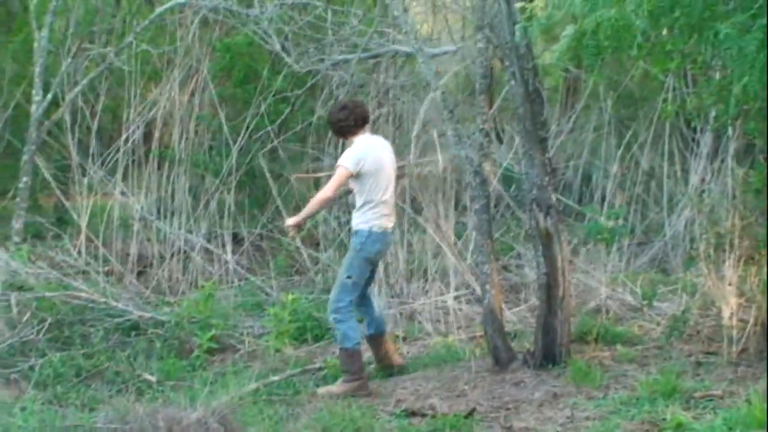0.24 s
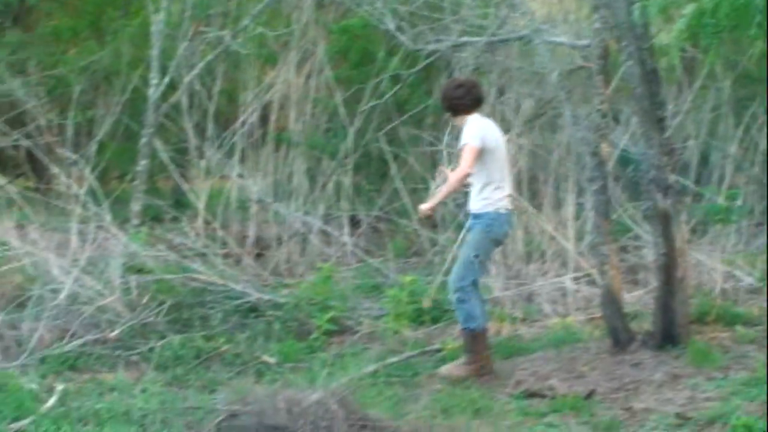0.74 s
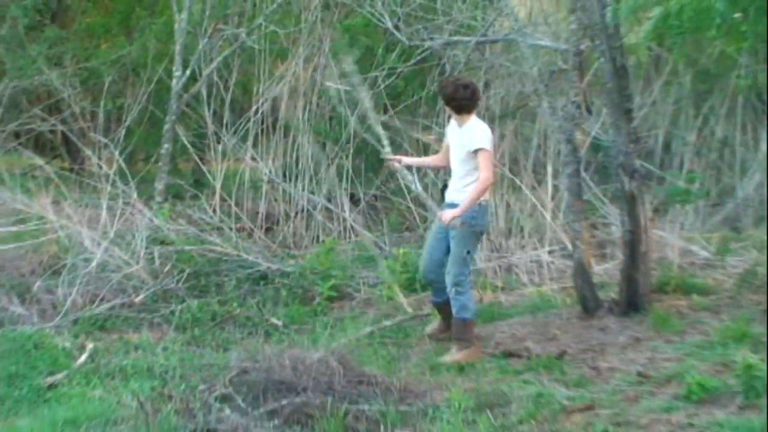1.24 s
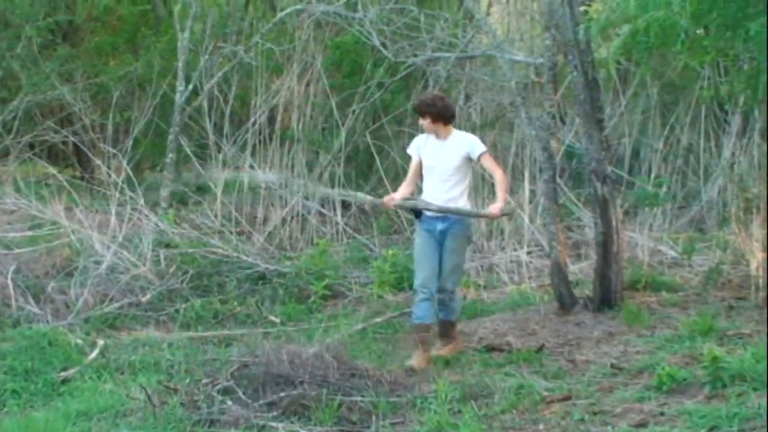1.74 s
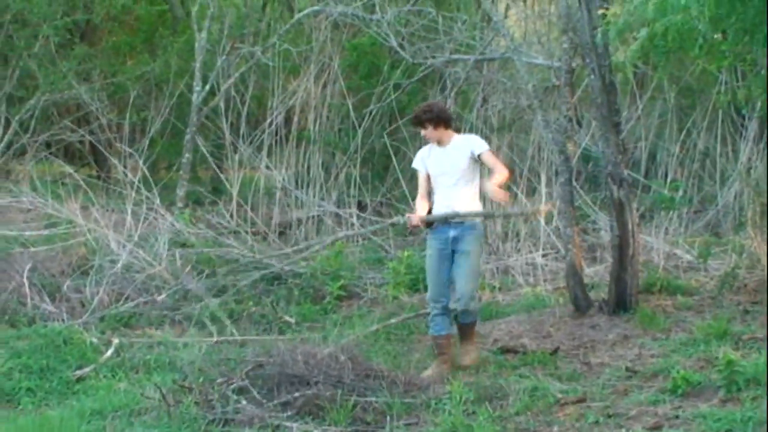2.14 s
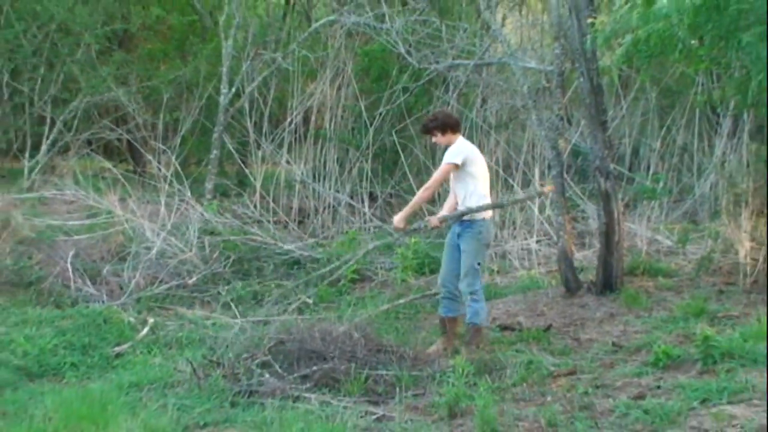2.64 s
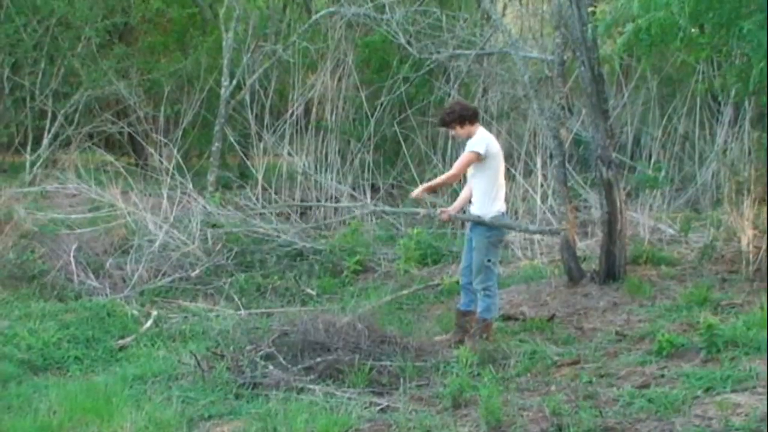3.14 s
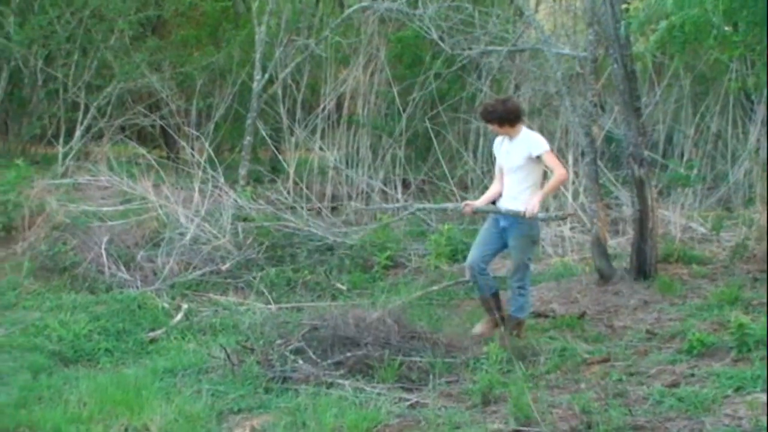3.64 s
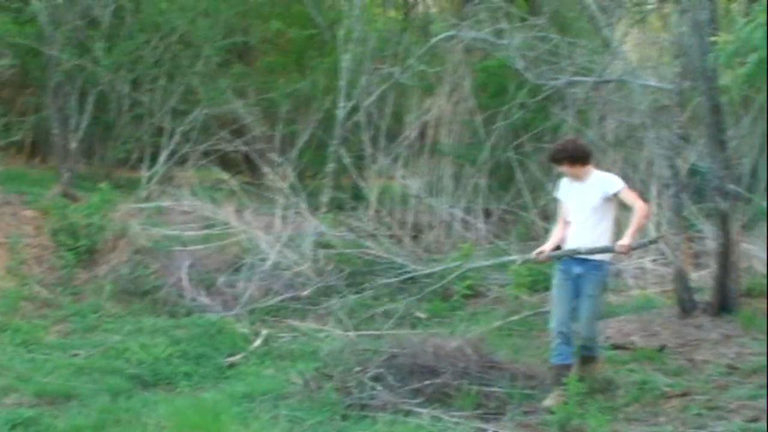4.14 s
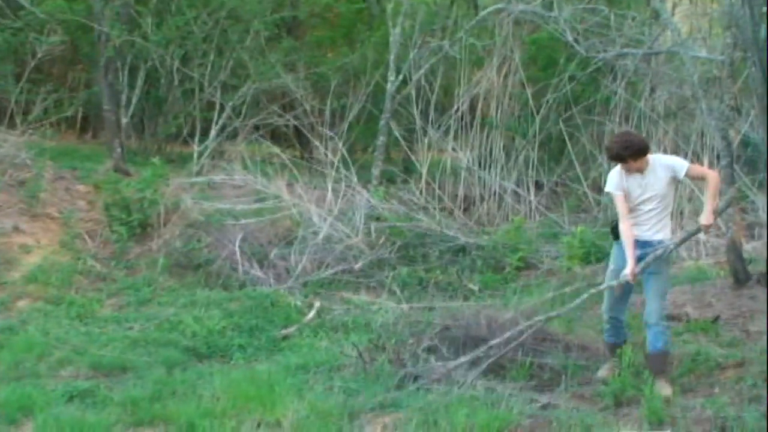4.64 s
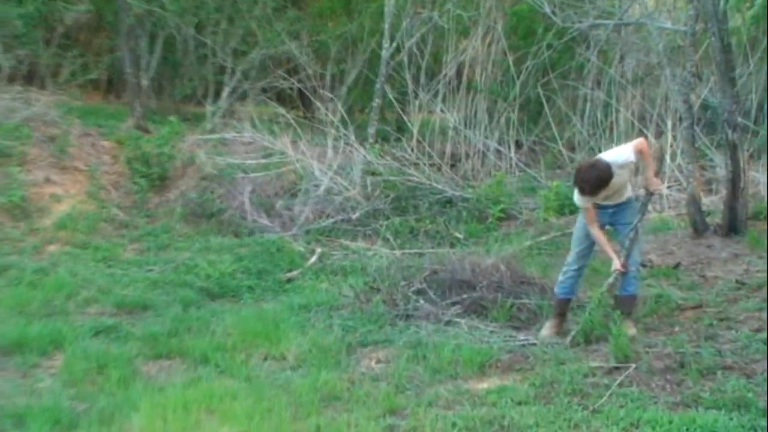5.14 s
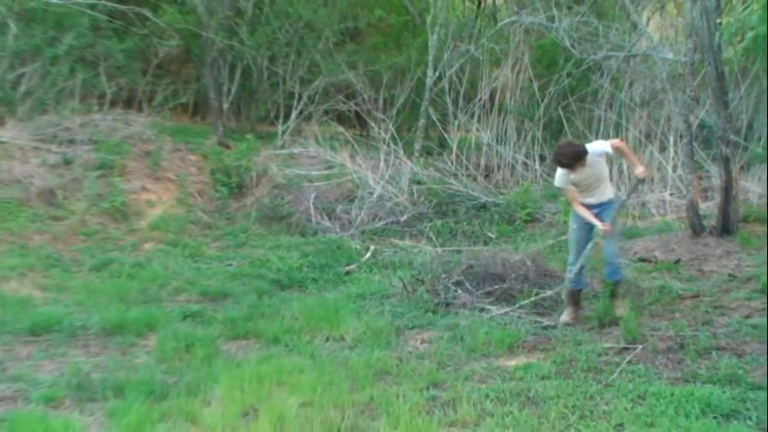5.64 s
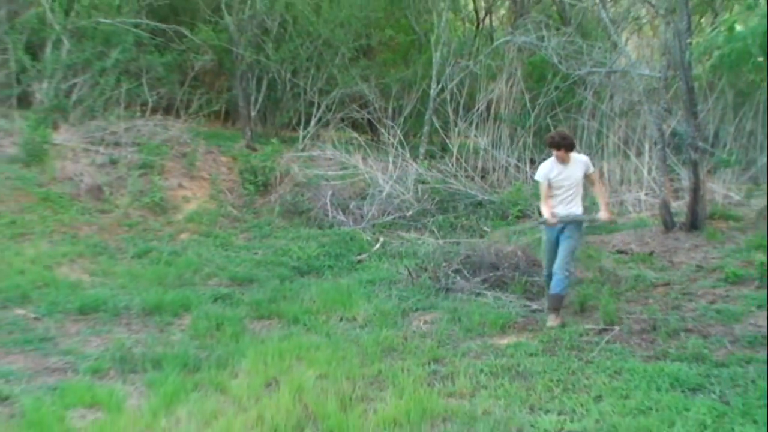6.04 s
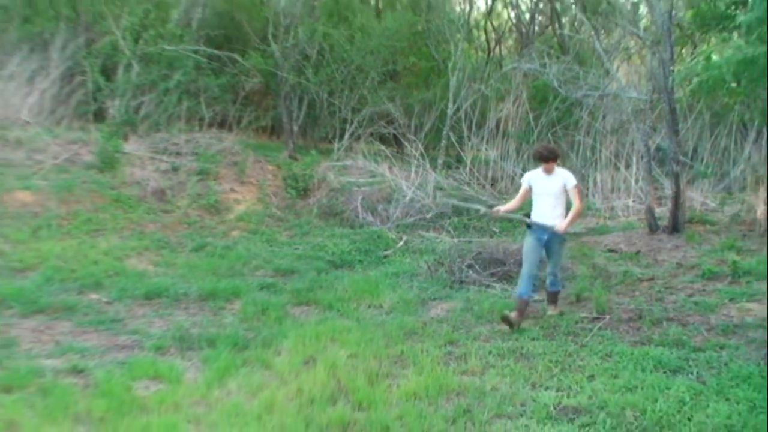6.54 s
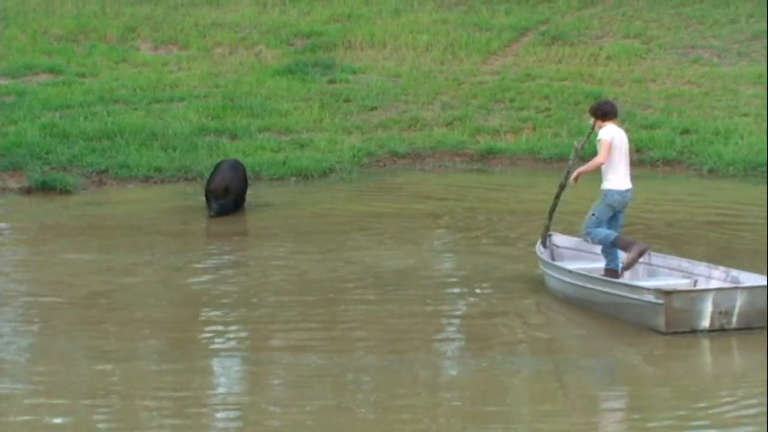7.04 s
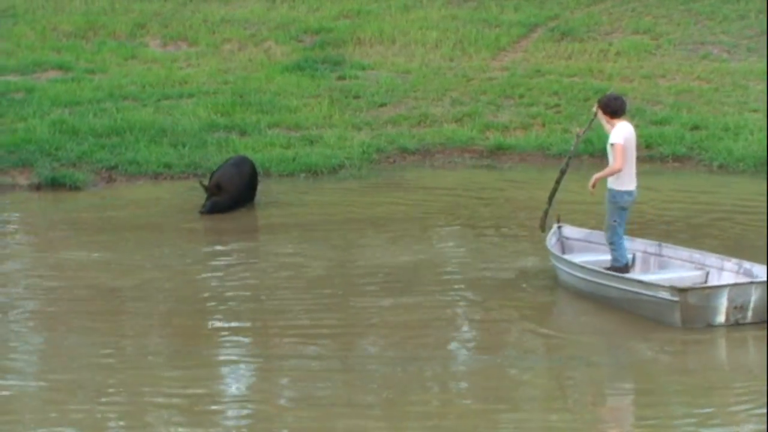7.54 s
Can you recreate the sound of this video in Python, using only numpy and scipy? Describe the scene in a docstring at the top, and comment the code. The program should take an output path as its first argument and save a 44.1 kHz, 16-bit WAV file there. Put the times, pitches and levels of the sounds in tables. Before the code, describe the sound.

From 0 to 1.2 seconds a dead branch is dragged through grass and brush: dense, bright leafy swishes, rapid twig snaps, a stick breaking cleanly near 0.55, and soft boot thuds near 0.9. Handling then thins to quiet stirring, with rising bird chirps from 1.4 to 2.3 and a crisp crack at 2.6. Low wind rumble swells around 3 to 4.5, with snaps near 3.1, 3.9 and 4.35 to 4.6 and a run of falling bird notes. The biggest crunch, woody and loud, comes at 5.0 to 5.2. Sparse light snaps and rustles follow until 6.7. Crickets chirp and katydids buzz throughout. At 6.74 the place abruptly changes to a pond: a strong hollow metal boat thump at 6.8, fainter knocks around 7.0 and 7.4, firmer ones at 7.5, a last at 7.7, with small ticks, slightly louder airy hiss and insect trill.

```python
"""Leaves rustle and twigs snap as a dead branch is dragged over grass and through brush; boots thud, wind buffets
the microphone; birds, crickets and a trilling katydid sing behind. The scene then moves to a pond, where boots
knock on a metal boat. Leaves, wind and air are shaped noise; twigs, soil and hull are bursts into resonators;
birds and crickets are gliding sines; katydids are throbbing noise bands."""
import sys
import numpy as np
from scipy import signal
from scipy.fft import rfft, irfft, next_fast_len
from scipy.io import wavfile

SR = 44100
rng = np.random.default_rng(int(sys.argv[2]) if len(sys.argv) > 2 else 0)


def transcribe(signal):
    """Save signal, clipped to [-1, 1], as a 16-bit WAV file at the path in sys.argv[1]."""
    frames = np.atleast_2d(signal).T
    limited = np.clip(frames, -1, 1)
    pcm = np.round(limited * 32767).astype(np.int16)
    wavfile.write(sys.argv[1], SR, pcm)


N = 343362
T = np.arange(N) / SR
POND_S = 6.735   # the scene moves to the pond
# Left-right likeness of the ports. Each row: pitch in Hz, correlation (0 to 1).
LIKENESS = [(40, 0.56), (200, 0.21), (1200, 0.57), (5000, 0.28), (15000, 0.24)]


def from_db(db):
    """Decibels to amplitude ratio."""
    return 10 ** (np.asarray(db) / 20)


def rms_one(x):
    """Scale to unit RMS."""
    return x / np.sqrt(np.mean(x ** 2) + 1e-20)


def in_time(rows):
    """Straight lines between timed rows, one curve per column."""
    s, *columns = np.transpose(rows)
    return [np.interp(T, s, c) for c in columns]


def at_hz(points, hz):
    """Read a curve at a pitch, linear in log frequency."""
    points_hz, values = np.array(points).T
    return np.interp(np.log(hz), np.log(points_hz), values)


def band(x, low_hz, high_hz):
    """Butterworth band-pass."""
    return signal.sosfilt(signal.butter(2, [low_hz, high_hz], "band", fs=SR, output="sos"), x)


def drift(rate_hz):
    """Slow random curve of unit RMS: noise through two equal poles at SR / 40."""
    r = np.exp(-80 * np.pi * rate_hz / SR)
    noise = rng.standard_normal(N // 40 + 2002)
    slow = signal.lfilter([1], [1, -2 * r, r * r], noise)[2000:]
    return np.interp(np.arange(N) / 40, np.arange(len(slow)), rms_one(slow))


def ring(x, hz, t60_s):
    """Two-pole resonator: a unit click sets a sine of height 1 ringing."""
    r = from_db(-60 / (t60_s * SR))
    w = 2 * np.pi * hz / SR
    return signal.lfilter([0, np.sin(w)], [1, -2 * r * np.cos(w), r * r], x + 1e-18)


def add(out, s, sound):
    """Mix a sound in at s seconds."""
    i = round(s * SR)
    out[..., i:i + sound.shape[-1]] += sound[..., :N - i]


def spread(mid, side, alike):
    """Left and right from mid and side noise, with the given correlation."""
    return np.sqrt(.5 + alike / 2) * mid + np.sqrt(.5 - alike / 2) * side * [[1], [-1]]


def pair(hz):
    """Left and right noise as alike as the ports make it at this pitch."""
    mid, side = rng.standard_normal((2, N))
    return spread(mid, side, np.clip(at_hz(LIKENESS, hz), -1, 1))


def banded(spectrum, tilt_db, patchy_db, grain=1, bass_share=1):
    """Half-octave noise bands under one grain envelope; tilt pivots at 3 kHz, bass_share scales it below."""
    out, power = 0, 0
    edges_hz = 60 * 2 ** np.arange(0, 8.6, .5)
    white = rng.standard_normal((2, 2, N)) * grain
    together = drift(29.0)
    for k, (low_hz, high_hz) in enumerate(zip(edges_hz, edges_hz[1:])):
        mid, side = band(white[k % 2], low_hz, high_hz)
        hz = np.sqrt(low_hz * high_hz)
        alike = np.clip(at_hz(LIKENESS, hz), -1, 1)
        both = from_db(at_hz(spectrum, hz)) * np.sqrt(2) * spread(mid, side, alike)
        power += np.mean(both ** 2)
        octaves = np.log2(hz / 3000) * (1 if hz > 3000 else bass_share)
        patches = .6 * together + drift(10)
        out = out + both * from_db(tilt_db * octaves + patchy_db * patches)
    return out / np.sqrt(power)


def dragging():
    """Rustle level and brightness: sweeps swell, hold and fade over quiet stirring; brightness is power-weighted."""
    # Quiet rustle of grass and clothes between the pulls.
    # Each row: time in seconds, level in dB, brightness in dB per octave.
    stirring = [(0, -53, -5), (1.22, -47, 5), (1.3, -50.5, 4), (1.55, -49, 1), (1.8, -55.5, 6),
                (2.3, -55.5, 7), (3.0, -58.5, 7), (3.4, -61.5, 6.5), (3.8, -57.5, 5), (5.4, -58, 5.5),
                (6.7, -56.5, 4.5), (6.75, -63, 0), (7.78, -72, 14)]
    # Pulls and steps through leaves.
    # Each row: start in seconds, hold in seconds, level in dB, brightness in dB per octave.
    pulls = [(0.0, 0.0072, -42, 5.5), (0.113, 0.14, -44, 4.5), (0.32, 0.23, -43, 5), (0.705, 0.16, -44, 1),
             (0.946, 0.1, -43, -3), (1.1, 0.046, -42.5, 1.5), (1.853, 0.0082, -49, 3.5),
             (2.15, 0.0087, -51, -0.5), (2.455, .01, -52.5, -1), (3.09, 0.1, -51.5, 3),
             (3.89, 0.08, -46, 6), (4.01, 0.14, -48.5, 3.5), (4.363, 0.017, -50, 7),
             (4.477, 0.039, -44.5, 5), (4.775, 0.0092, -46.5, 1), (4.998, 0.027, -47.5, 2),
             (5.113, 0.08, -37, -1), (5.593, 0.0077, -50.5, 3), (5.897, 0.029, -51.5, 2.5),
             (6.032, .01, -47, 2.5), (6.29, 0.021, -51.5, 1)]
    swell_db_per_s, fade_db_per_s = 161, 103
    stir_db, stir_bright_db = in_time(stirring)
    power = from_db(2 * stir_db)
    bright = power * stir_bright_db
    for s, hold_s, level_db, bright_db in pulls:
        before_s, after_s = np.maximum(s - T, 0), np.maximum(T - s - hold_s, 0)
        sweep = from_db(2 * (level_db - swell_db_per_s * before_s - fade_db_per_s * after_s))
        power = power + sweep
        bright = bright + sweep * bright_db
    return 10 * np.log10(power), bright / power


def rustle(per_s=250, spread_db=3.0, grain_s=0.003, smooth=4.1, stems_db=-6, clump_db=6.0, even_db=4.0, twang_db=-9):
    """Leaves scrape as a grainy swish the branch colours; thin stems tick at pitches of their own, in clumps."""
    # Leaf noise before brightness. Each row: pitch in Hz, relative density in dB per Hz.
    leaf_spectrum = [(180, -11), (350, 0), (900, -4), (1500, -2), (3500, 4.5), (6500, -1), (9500, -5.5),
                     (13300, -11), (16000, -18)]
    # Branch resonances: pitches in Hz.
    branch_hz = (1570, 3326, 4800)
    level_db, bright_db = dragging()
    sizes = from_db(spread_db * np.minimum(rng.exponential(1, N), 4.0))
    chance = per_s * from_db(drift(12.0) * [[even_db], [clump_db]]) / SR
    born = rng.random((2, N)) < chance   # leaf cracks, stem ticks
    cracks = signal.lfilter([1], [1, -np.exp(-1 / (grain_s * SR))], sizes * born[0])
    swish = banded(leaf_spectrum, bright_db, 1.1, grain=rms_one(smooth + cracks), bass_share=-0.17)
    twang = sum(rms_one(ring(swish, hz, 0.013)) for hz in branch_hz)
    swish = swish + from_db(twang_db) * twang
    dealt = rng.integers(0, 16, N)   # which stem ticks
    stems = 0
    for k, hz in enumerate(np.geomspace(1500, 7000, 16)):
        stems = stems + rms_one(ring(sizes * born[1] * (dealt == k), hz, 51.0 / hz))
    return from_db(level_db) * (swish + from_db(stems_db) * rms_one(stems))


def snaps(wood_width=0.22, wood_s=0.022, crack_s=0.0085, spike=1.0, tail_db=-20, tail_s=0.24):
    """A tearing burst rings the twig at its pitch and cracks in the treble; splinters and brush echoes trail."""
    # Twigs. Each row: time in seconds, wood level in dB, wood pitch in Hz, treble crack level in dB.
    twigs = [(0.168, -25, 3800, -24), (0.3325, -23, 4700, -22), (0.3727, -22, 4560, -21),
             (0.393, -22.5, 2760, -36), (0.4643, -23.5, 2340, -28), (0.5464, -27, 1270, -17.5),
             (0.642, -29, 2950, -28), (0.777, -26, 2600, -35), (0.827, -25, 2600, -34),
             (0.854, -26, 2640, -36), (0.893, -30, 2900, -42), (0.9538, -22, 3350, -46),
             (1.024, -27.5, 1720, -44), (1.035, -20.5, 3630, -43), (1.082, -23, 2000, -40),
             (1.109, -24, 1600, -42), (1.12, -27, 2020, -39), (1.823, -26, 2420, -45),
             (1.8381, -22.5, 3420, -44), (1.9798, -32.5, 3600, -13), (2.1298, -29.5, 2350, -50),
             (2.161, -30.5, 2400, -45), (2.288, -34, 4960, -39), (2.469, -31.5, 2710, -42),
             (2.604, -34, 4740, -27), (2.622, -23.5, 3870, -12), (2.7162, -28.5, 3900, -21.5),
             (2.84, -42, 2320, -31), (3.1217, -21.5, 5800, -20), (3.1318, -17.5, 4130, -23),
             (3.147, -26, 1320, -34), (3.219, -39, 4000, -39), (3.3034, -40.5, 2720, -32),
             (3.8706, -35, 3740, -23), (3.89, -43, 3050, -21), (3.913, -25.5, 3770, -13.5),
             (3.953, -29, 3230, -17), (4.0522, -25.5, 3180, -15), (4.3303, -28, 5600, -18),
             (4.3547, -24.5, 5270, -9.5), (4.3813, -34, 5050, -21), (4.384, -26, 5050, -26),
             (4.394, -45, 5000, -20), (4.4547, -29.5, 4070, -20.5), (4.4902, -33, 2950, -31),
             (4.564, -22, 5300, -11.5), (4.7633, -26, 1770, -33), (4.982, -16, 1740, -19),
             (5.028, -21.5, 1820, -35), (5.0485, -23, 3000, -32), (5.0785, -10, 2130, -13),
             (5.1091, -18.5, 2820, -22), (5.1639, -10, 2980, -32), (5.1655, -10, 1590, -20),
             (5.498, -39, 2280, -27), (5.8244, -29.5, 2140, -30), (5.8507, -31.5, 4800, -37),
             (5.9953, -28, 2330, -38), (6.007, -34, 2080, -40), (6.049, -35, 2220, -27),
             (6.1955, -30.5, 2600, -15.5), (6.39, -53, 2670, -36), (6.427, -50, 1630, -31),
             (6.4312, -30, 1760, -13), (6.456, -49, 1530, -50), (6.545, -47, 4090, -21.5),
             (6.578, -33.5, 2540, -41), (6.7207, -33, 2680, -23)]
    out, t = np.zeros((2, N)), np.arange(12000) / SR
    for s, wood_db, hz, crack_db in twigs:
        noise = rng.standard_normal((3, len(t)))
        burst = noise[0] * from_db(-60 * t / wood_s) * np.minimum(t / 0.00042, 1)
        tear = band(burst, hz / (1 + wood_width), hz * (1 + wood_width)) + .5 * band(burst, 1020, 10500)
        wood = rms_one(tear) + 0.26 * rms_one(ring(burst, hz, .045))
        crack = band((noise[0] + spike * (t == 0)) * from_db(-60 * t / crack_s), 6500, 15000)
        tail = from_db(tail_db - 60 * t / tail_s) * band(noise[1:] + 1.67 * noise[0], 1820, 8300)
        add(out, s, from_db(wood_db) * (wood / np.abs(wood).max() + tail))
        sides_db = np.array([[1.0], [-.8]])
        add(out, s, from_db(crack_db + sides_db) * crack / np.abs(crack).max())
    return out


def breaks(body_share=0.39, cycles=1.7):
    """A stick breaks clean in one blow: a broad click and a dull body that swings about once."""
    # Sticks. Each row: time in seconds, peak in dB, body pitch in Hz.
    sticks = [(0.5467, -15.5, 473), (6.4932, -29, 1100)]
    out, click = np.zeros(N), signal.unit_impulse(2000)
    for s, peak_db, hz in sticks:
        blow = band(click, 400, 8300) + body_share * ring(click, hz, cycles / hz)
        add(out, s, from_db(peak_db) * blow / np.abs(blow).max())
    return out


def thuds(cycles=7.3):
    """Soft ground: a dull push into a heavily damped resonance."""
    # Boots and the branch butt on the soil. Each row: time in seconds, peak in dB, pitch in Hz.
    soil_blows = [(0.424, -42, 290), (0.549, -46, 219), (0.591, -40, 197), (0.7, -40, 265),
                  (0.788, -34.5, 197), (0.855, -28, 263), (0.92, -27.5, 243), (2.58, -47.5, 183),
                  (2.945, -36, 284), (3.91, -47, 714), (3.98, -40, 750), (4.329, -37, 590),
                  (4.354, -38, 474), (4.492, -39, 520), (4.512, -42, 272), (4.563, -46, 400),
                  (5.194, -32.5, 223), (5.852, -42.5, 258), (6.025, -48, 520), (6.108, -44, 603),
                  (6.193, -46, 705), (6.455, -42, 630)]
    out, t = np.zeros(N), np.arange(4000) / SR
    for s, peak_db, hz in soil_blows:
        push = band(rng.standard_normal(len(t)) * from_db(-60 * t / 0.076), 148, 640)
        body = rms_one(ring(push, hz, cycles / hz)) + 0.32 * rms_one(push)
        add(out, s, from_db(peak_db) * body / np.abs(body).max())
    return out


def hull(contact_s=0.0082, scatter_db=0.5, side_db=4.0, fall_db=6.5, dense_db=-8.0, rise_s=0.0018, sole_hz=900):
    """A boot scuff excites the sheet-metal modes near its colour, and their crowd of weaker neighbours."""
    # Boots on the hull. Each row: time in seconds, level in dB, centre of the blow's colour in Hz.
    boot_blows = [(6.773, -22.5, 282), (6.807, -21, 192), (7.026, -33.5, 673), (7.136, -45, 550),
                  (7.364, -33, 447), (7.519, -25, 446), (7.534, -25.5, 345), (7.664, -31.5, 625),
                  (7.698, -37, 333)]
    # Hull modes. Each row: pitch in Hz, relative level in dB, 60 dB decay in seconds.
    hull_modes = [(161, 8.5, 0.81), (190.5, -0.5, 0.76), (222.4, 4.5, 0.16), (247.4, -8.5, 0.33),
                  (304.5, 1.5, 0.13), (328, -8, 0.13), (442, -3.5, 0.31), (490, -4.5, 0.21),
                  (556, 2.5, 0.11), (596, -6, 0.44), (620.5, 2, 0.16), (693, -2, 0.16)]
    out, t = np.zeros((2, N)), np.arange(22000) / SR
    rise = np.minimum(t / rise_s, 1)
    for s, peak_db, centre_hz in boot_blows:
        scuff = band(rng.standard_normal(len(t)) * np.exp(-t / contact_s) * rise, 117, sole_hz)
        strong_db = rng.normal(0, scatter_db, (30, 1)) + rng.normal(0, side_db, (30, 2))
        modes = 0
        for k, (hz, level_db, t60_s) in enumerate(hull_modes):
            mode_db = level_db - fall_db * np.log2(hz / centre_hz) ** 2 + strong_db[k]
            modes = modes + from_db(mode_db)[:, None] * rms_one(ring(scuff, hz, t60_s))
        crowd = band(rng.standard_normal(len(t)), centre_hz / 2.3, centre_hz * 1.3) * from_db(-60 * t / 0.59)
        crowd = band(crowd * rise, 103, sole_hz)
        body = modes / np.abs(modes).max() + from_db(dense_db) * crowd / np.abs(crowd).max()
        add(out, s, from_db(peak_db) * body)
    return out


def ticks(t60_s=0.053, width=1.52):
    """Small hard ticks on the boat: decaying noise bursts a little over an octave wide."""
    # Each row: time in seconds, peak in dB, centre in Hz.
    boat_ticks = [(7.01, -45, 3000), (7.034, -41.5, 1390), (7.075, -48, 2500), (7.155, -40.5, 1460),
                  (7.51, -45, 2500), (7.527, -37, 2100), (7.537, -38, 2170), (7.615, -42.5, 1860),
                  (7.67, -33, 2130), (7.695, -44, 2200)]
    out, t = np.zeros(N), np.arange(3000) / SR
    for s, peak_db, hz in boat_ticks:
        tick = band(rng.standard_normal(len(t)) * from_db(-60 * t / t60_s), hz / width, hz * width)
        add(out, s, from_db(peak_db) * tick / np.abs(tick).max())
    return out


def wind():
    """Eddies on the ports: lumpy low noise, partly its own in each channel."""
    # Each row: time in seconds, buffeting level in dB, flutter level in dB.
    gusts = [(0, -54, -60), (0.5, -46.5, -57), (0.68, -49, -53.5), (0.8, -46, -40.5), (0.95, -51, -35),
             (1.15, -44.5, -61), (1.8, -47.5, -74), (2.4, -42.5, -69), (2.75, -45, -70), (3.05, -36, -48),
             (3.25, -32, -62), (3.6, -38.5, -80), (4.1, -35.5, -70), (4.7, -41, -47), (5.2, -43.5, -72),
             (5.5, -45.5, -60), (6.0, -52, -60), (6.7, -49.5, -61), (6.78, -57, -51), (7.2, -66, -58),
             (7.35, -65, -49.5), (7.55, -52, -45.5), (7.78, -66, -57)]
    buffet_db, flutter_db = in_time(gusts)
    buffet = rms_one(band(pair(30), 12, 42))
    flutter = rms_one(band(pair(70), 48, 90))
    lumps = from_db(1.0 * drift(5.6))
    sides = from_db([[2.0], [-0.3]])
    return (from_db(buffet_db) * buffet + from_db(flutter_db) * flutter) * lumps * sides


def birds():
    """Near-sine glides between two pitches; bend flattens the glide's end, swell places the loudest point."""
    # Rising notes of one shape. Each row: start in seconds, level in dB.
    rising_notes = [(1.381, -50), (1.612, -48), (1.85, -48), (2.078, -45), (2.32, -51)]
    # Falling notes of one shape. Each row: start in seconds, level in dB.
    falling_notes = [(3.319, -54), (3.47, -53), (3.613, -51), (3.75, -50), (3.90, -50), (4.03, -57),
                     (4.17, -51), (4.303, -52), (4.452, -50), (4.575, -48.5), (4.721, -48), (4.865, -50)]
    # Free whistles. Each row: start in seconds, length in seconds, first pitch in Hz, last pitch in Hz, level in dB.
    free_whistles = [(0.0, 0.035, 2395, 2500, -48.5), (0.22, 0.22, 2510, 2380, -49.5),
                     (0.52, 0.15, 2460, 2360, -54), (2.19, 0.1, 2690, 3120, -57),
                     (2.87, 0.16, 2050, 1736, -57.5), (4.46, 0.063, 2445, 2310, -52.5),
                     (4.643, 0.11, 2456, 2383, -49), (4.855, .035, 2410, 2410, -58),
                     (4.903, 0.12, 2460, 2396, -50.5), (5.38, 0.19, 2446, 2310, -55),
                     (5.64, 0.18, 2430, 2366, -56.5), (5.93, 0.14, 2530, 2410, -56.5),
                     (6.19, 0.14, 2447, 2395, -53.5), (6.365, 0.13, 2850, 2040, -54.5),
                     (6.47, 0.083, 2090, 1970, -62), (6.575, 0.036, 3000, 3030, -55),
                     (7.405, 0.033, 3450, 3650, -61), (7.705, 0.032, 3400, 3600, -61)]
    out, waver_hz = np.zeros(N), 10 * drift(30)
    rising = [(s, .042, 1750, 2670, db) for s, db in rising_notes]
    falling = [(s, .064, 4600, 2970, db) for s, db in falling_notes]
    for notes, bend, swell in ((rising, 1.7, 1.8), (falling, 1.9, 2.3), (free_whistles, 1.0, .9)):
        for s, length_s, first_hz, last_hz, level_db in notes:
            u = np.linspace(0, 1, round(length_s * SR))
            glide_hz = last_hz + (first_hz - last_hz) * (1 - u) ** bend
            phase = 2 * np.pi * np.cumsum(glide_hz + waver_hz[round(s * SR):][:len(u)]) / SR
            envelope = np.abs(np.sin(np.pi * u ** swell)) ** 0.35
            add(out, s, np.sqrt(2) * from_db(level_db) * envelope * np.sin(phase))
    echoes = sum(from_db(db) * np.roll(out, round(s * SR)) for s, db in ((.013, -11), (.029, -15), (.047, -18)))
    return (out + echoes) * from_db(1.2 * drift(25) + 2 * drift(90))


def crickets(pulse_s=.02, apart_s=.031):
    """Two wing strokes a chirp, each a short gliding tone; far crickets chirp at their own pace."""
    # Nearest cricket. Each row: start in seconds, level in dB.
    near_chirps = [(1.52, -55), (1.75, -50), (2.26, -47.5), (2.735, -46.5), (3.175, -47), (3.422, -49),
                   (3.99, -48), (4.215, -48), (4.69, -47.5), (4.93, -52), (5.422, -49.5), (5.64, -60),
                   (5.875, -46.5), (6.111, -48.5), (6.34, -47), (6.57, -48.5), (6.836, -54), (7.081, -54.5),
                   (7.332, -53), (7.578, -53.5)]
    # Far crickets. Each row: pitch in Hz, chirps per second, mean level in dB.
    far_crickets = [(6200, 3.7, -66), (6350, 4.7, -63), (6500, 3.9, -62), (6600, 4.1, -62),
                    (6720, 4.5, -63)]
    brush_hz, pond_hz = 6420, 5700
    low_s, low_apart_s, low_hurry_s, low_hz, low_db = 3.262, .2378, .00028, 6010, -57.5
    out, u = np.zeros((2, N)), np.linspace(0, 1, round(pulse_s * SR))
    # chirps: start s, Hz, dB, pan dB, pitch sag as a share (negative rises)
    chirps = [(s, brush_hz if s < POND_S else pond_hz, db, 0, .015) for s, db in near_chirps]
    for k in range(-13, 15):   # a steady lower cricket, slowly quickening
        s = low_s + low_apart_s * k - low_hurry_s * k * k
        chirps.append((s, low_hz, low_db + 2 * rng.normal(), 0, -.015))
    for hz, per_s, db in far_crickets:
        for s in np.arange(.03 + rng.random() / per_s, N / SR - .1, 1 / per_s):
            chirps.append((s + 0.01 * rng.normal(), hz, db + 2 * rng.normal(), 10.0 * rng.normal(), .025))
    for s, hz, level_db, pan_db, sag in chirps:
        stroke = np.sin(np.pi * u) * np.sin(2 * np.pi * np.cumsum(hz * (1 + sag * (.5 - u))) / SR)
        sides_db = np.array([[.5], [-.5]]) * pan_db
        for late_s in (0, apart_s):
            add(out, s + late_s, 2 * from_db(level_db + sides_db) * stroke)
    return out


def katydids():
    """Raspy bands that throb once per wing stroke."""
    # Each row: pitch in Hz, width in Hz, strokes per second, throb sharpness, pure tone amplitude against
    # unit noise, level in the brush in dB, level at the pond in dB.
    raspers = [(8930, 500, 59.4, 3.0, .4, -64, -58.5), (8550, 1350, 49.5, .6, 0, -59, -55),
               (6480, 750, 32.0, 1.2, 0, -62, -61)]
    out = 0
    for hz, width_hz, per_s, sharp, tone, brush_db, pond_db in raspers:
        throb = np.exp(sharp * np.cos(2 * np.pi * per_s * T + .3 * drift(3)) / 2)
        scrape = pair(hz) + tone * np.sin(2 * np.pi * hz * T + 1.5 * drift(20))
        edges_hz = hz - width_hz / 2, hz + width_hz / 2
        rasp = band(band(scrape * throb, *edges_hz), *edges_hz)
        out = out + from_db(np.where(T < POND_S, brush_db, pond_db)) * rms_one(rasp)
    return out


def far_air():
    """Far leaves and hiss: steady patchy noise, louder and slightly darker at the pond."""
    # Each row: pitch in Hz, relative density in dB per Hz.
    air_spectrum = [(60, -8), (110, -12), (155, -4), (300, -8), (450, -17), (1100, -24), (3000, -25),
                    (5500, -26), (9000, -27), (11500, -29), (16000, -32)]
    brush_db, pond_db, pond_tilt_db_per_octave = -54.5, -51, -0.5
    pond = T >= POND_S
    return from_db(np.where(pond, pond_db, brush_db)) * banded(air_spectrum, pond * pond_tilt_db_per_octave, 0.91)


def scene():
    """Sum of the drag, the boat, the wind and the background."""
    drag = rustle() + snaps() + breaks() + thuds()
    boat = hull() + ticks()
    background = birds() + crickets() + katydids() + far_air()
    return drag + boat + wind() + background


def record(dry):
    """The right port lags the left; a steep low-pass cuts the top."""
    port_lag_s, cutoff_hz = 5.2e-5, 15800
    size = next_fast_len(N + 64)
    hz = np.fft.rfftfreq(size, 1 / SR)
    right = irfft(rfft(dry[1], size) * np.exp(-2j * np.pi * hz * port_lag_s), size)[:N]
    low_pass = signal.ellip(12, .5, 80, cutoff_hz, fs=SR, output="sos")
    return signal.sosfilt(low_pass, [dry[0], right])


dry = scene()
out = record(dry)
transcribe(out)
```